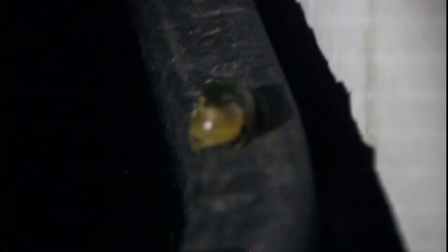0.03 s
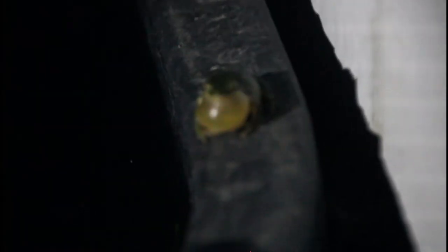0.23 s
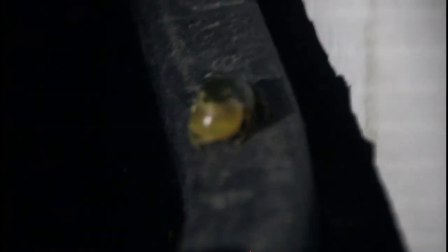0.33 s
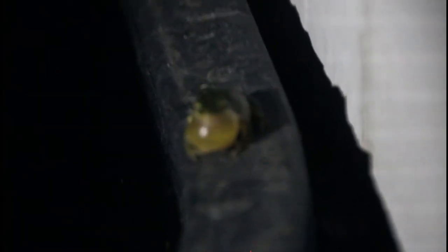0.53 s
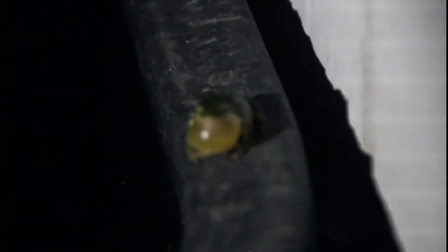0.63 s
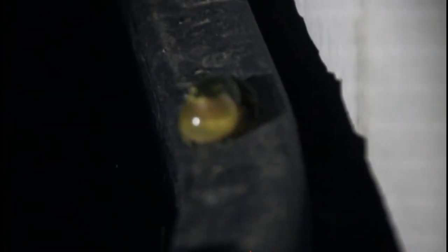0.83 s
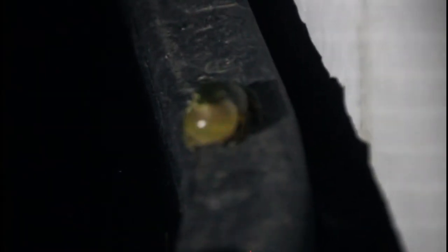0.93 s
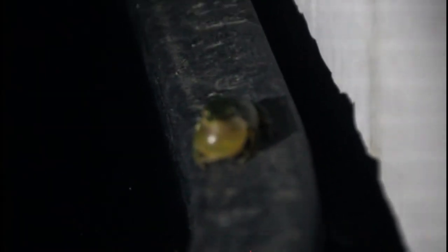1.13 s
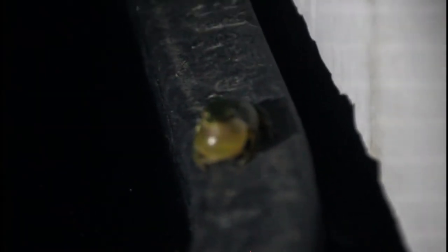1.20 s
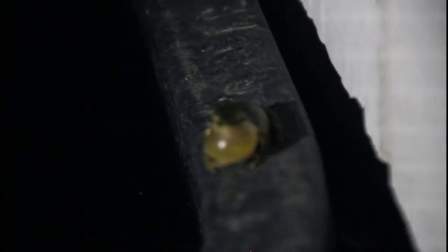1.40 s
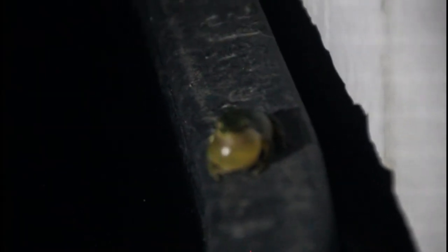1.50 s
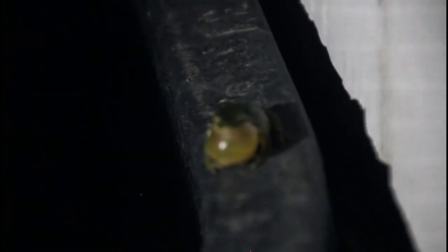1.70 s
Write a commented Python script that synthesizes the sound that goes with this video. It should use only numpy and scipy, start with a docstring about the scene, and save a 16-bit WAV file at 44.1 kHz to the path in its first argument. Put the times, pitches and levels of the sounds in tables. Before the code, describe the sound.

A small tree frog gives one harsh two-note croak over a low outdoor rumble.

```python
"""Outdoors at night, over a low rumble: a small tree frog close to the microphone gives one harsh,
two-note croak. Each note is a run of short pulses: a snap of the larynx rings the throat, then come
a few cycles of raspy tone whose octave the vocal sac favours. Near surfaces throw the call back.
The croak drives the recorder's limiter, so the background ducks and swells back."""
import sys
import numpy as np
from scipy import signal
from scipy.fft import rfft, irfft
from scipy.io import wavfile
from scipy.ndimage import uniform_filter1d, minimum_filter1d

SR = 44100
rng = np.random.default_rng(int(sys.argv[2]) if len(sys.argv) > 2 else 0)


def transcribe(u):
    """Save the signal u as a 16-bit wav file named by the first command-line argument.

    u: samples, shape (n,) or (channels, n), limited to [-1, 1]; the rate is SR.
    q: integer samples, one column per channel.
    """
    v = np.clip(np.atleast_2d(u).T, -1, 1)
    q = np.round(v * 32767).astype(np.int16)
    wavfile.write(sys.argv[1], SR, q)


N = 77175
TIME = np.arange(N) / SR

# Spectrum of the night air. Each row: frequency in Hz, relative density in dB.
AIR_SPECTRUM = [(12, -43), (20, -38), (58, -3), (127, -1), (177, -7.5), (204, -14.5), (241, -12),
                (347, -22), (459, -21.5), (698, -33), (923, -28), (1090, -34.5), (1330, -32.5), (1570, -39),
                (1810, -36), (2200, -44.5), (3530, -50), (4060, -50.5), (8650, -57.5), (14700, -58),
                (16000, -53.5)]
# Slow rise and fall of the bass. Each row: time in seconds, gain in dB.
BASS_LEVEL = [(0, -4), (.18, 0), (.36, 1), (.55, 1), (.73, 2.5), (.92, 0), (1.14, -0.5), (1.3, 1),
              (1.5, -1), (1.75, -2.5)]
# The same for the hiss above the bass. Each row: time in seconds, gain in dB.
HISS_LEVEL = [(0, 1), (.7, 0.5), (1.1, -0.5), (1.5, 0.5), (1.75, 1)]
# Overall level, which dips briefly at the start. Each row: time in seconds, gain in dB.
OVERALL_LEVEL = [(.03, 1), (.044, -12), (.05, -27), (.064, -35), (.075, -15), (.093, 1)]
# Reflections off surfaces near the frog. Each row: delay in seconds, gain in dB.
ECHOES = [(.0034, -19), (.0088, -31)]
# Colour of the diffuse tail. Each row: frequency in Hz, relative density in dB.
TAIL_SPECTRUM = [(500, 2.5), (1650, -1), (2500, -2), (3380, -4), (4000, 2.5), (4800, -2), (5150, 12),
                 (5600, 6.5), (6800, -3), (9400, -4), (10150, 9), (11000, -7.5), (16000, -5.5)]
# Soft whines between the notes. Each row: start and length in seconds, first and last pitch in Hz,
# level in dB.
WHINES = [(.785, .085, 839, 760, -28), (.812, 0.053, 1220, 1320, -26.5), (.815, 0.083, 1650, 1590, -30.5)]
# Pulses of the croak. Each row: start in seconds, level in dB, pitch in Hz, swell in seconds,
# snap in dB relative to the pulse, top of the treble in Hz.
PULSES = [(0.7111, -28, 1610, 0.0003, 2, 4000), (0.7264, -8, 1550, 0.00096, 6, 6200),
          (0.7374, -3, 1503, .0010, 6, 6500), (0.7477, 3.5, 1582, 0.000506, 6.5, 8200),
          (0.7581, 1, 1590, .0006, 6, 9500), (0.7687, 6, 1593, 0.002, -7, 11000),
          (.7799, 10.5, 1632, .0016, -4, 12500), (0.7903, 10, 1646, 0.0023, -12.5, 12500),
          (0.8013, 6.5, 1629, .0020, -9.5, 12500), (0.8679, 12.5, 1679, .0022, -11.5, 13000),
          (0.8776, 9, 1687, 0.0023, -24.5, 12500), (0.888, 5, 1691, 0.0036, -26, 12000),
          (0.9026, 1, 1702, 0.0019, -25, 11000)]
# Nearly harmonic partials of the tone. Each row: multiple of the pitch, relative level in dB.
PARTIALS = [(.98, -10.5), (2, -4.5), (3.06, -40), (4, -38), (5, -44.5), (6.15, -47.5), (7.7, -55.5)]
# Throat and sac resonances. Each row: frequency in Hz, relative level in dB, seconds to fall 60 dB.
THROAT_MODES = [(1590, -17, 0.013), (2280, -13, 0.005), (2900, -3, 0.0093), (3239, -9, 0.018),
                (4400, -33, 0.0097), (5976, -29, .008), (7760, -30, 0.0056), (12700, -29, .016)]
# Rasp riding on the pulses. Each row: frequency in Hz, relative density in dB.
RASP_SPECTRUM = [(600, -34), (1500, -8.5), (2600, 11.5), (3800, 2), (4400, -3), (5500, -17.5), (6700, -8),
                 (9400, -25.5), (10600, -18), (13000, -28), (16000, -27.5)]

AIR_DB, SWAY_DB, SWAY_HZ, BASS_TOP_HZ = -29, 1.0, 4.5, 270
HUM_HZ, HUM_DB, HUM_WAVER_SHARE, HUM_SWAY_DB = 121, -39, 0.0535, 5
TAIL_DB, TAIL_DELAY_S = -18, .009
TAIL_LOW_T60_S, TAIL_TREBLE_T60_S, TAIL_SPLIT_HZ = 0.3, 0.25, 3200
JITTER_SHARE, JITTER_HZ, WHINE_WAVER_SHARE = .006, 500, 0.077
ONSET_S, START_SHARE, HOLD_PER_SWELL, FADE_S, FADE_PER_SWELL = .0003, .38, .5, .0011, .22
SAC_LOW_HZ, SNAP_SOFT_HZ = 1242, 8000
RASP_DB, RASP_DB_PER_DB, RASP_PULSING_DEPTH = -24, 0.068, 0.45
LIMIT_DB, LIMIT_ATTACK_S, LIMIT_HOLD_S, RELEASE_DB_PER_S = -0.2, 0.00019, 0.091, 36
STOPBAND_HZ = 16600


def from_db(db):
    """Decibels to gain."""
    return 10 ** (np.asarray(db) / 20)


def unit_rms(x):
    """Scale to unit rms."""
    return x / np.sqrt(np.mean(x ** 2) + 1e-20)


def curve(rows):
    """Join (seconds, value) rows by straight lines."""
    return np.interp(TIME, *np.transpose(rows))


def butter(order, hz, kind="low"):
    """Sections of a low-pass or high-pass filter."""
    return signal.butter(order, hz, kind, fs=SR, output="sos")


def noise(spectrum):
    """Unit noise with a given (Hz, dB) colour."""
    hz, db = np.transpose(spectrum)
    bins = np.maximum(np.fft.rfftfreq(N, 1 / SR), 1)
    gain = from_db(np.interp(np.log(bins), np.log(hz), db)) * np.minimum(bins / hz[0], 1)
    return unit_rms(irfft(rfft(rng.standard_normal(N)) * gain, N))


def drift(hz):
    """Smooth random wander of unit rms, mostly slower than hz."""
    bins = np.fft.rfftfreq(N, 1 / SR)
    return unit_rms(irfft(rfft(rng.standard_normal(N)) / (1 + (bins / hz) ** 2), N))


def ring(clicks, hz, t60):
    """A unit click sets a decaying sine of height 1 ringing."""
    radius, angle = from_db(-60 / (t60 * SR)), 2 * np.pi * hz / SR
    return signal.lfilter([0, np.sin(angle)], [1, -2 * radius * np.cos(angle), radius ** 2],
                          clicks + 1e-18)


def night_air():
    """All around the microphone, a low rumble and a wavering hum sway gently under a smooth hiss."""
    air = from_db(AIR_DB) * noise(AIR_SPECTRUM)
    bass = signal.sosfiltfilt(butter(2, BASS_TOP_HZ), air)
    hiss = (air - bass) * from_db(curve(HISS_LEVEL))
    phase = 2 * np.pi * np.cumsum(HUM_HZ * (1 + HUM_WAVER_SHARE * drift(hz=7.1))) / SR
    hum = from_db(HUM_DB + HUM_SWAY_DB * drift(SWAY_HZ)) * np.sin(phase)
    sway = from_db(curve(BASS_LEVEL) + SWAY_DB * drift(SWAY_HZ))
    return hiss + (bass + hum) * sway


def surroundings(call):
    """The call arrives direct, then off two near surfaces, then as a thin tail, treble dying first."""
    wash = noise(TAIL_SPECTRUM) * (TIME > TAIL_DELAY_S)
    low = signal.sosfiltfilt(butter(6, TAIL_SPLIT_HZ), wash)
    tail = low * from_db(-60 * TIME / TAIL_LOW_T60_S)
    tail += (wash - low) * from_db(-60 * TIME / TAIL_TREBLE_T60_S)
    tail *= from_db(TAIL_DB) / np.sqrt(np.sum(tail ** 2))
    near = sum(from_db(db) * np.interp(TIME - delay, TIME, call) for delay, db in ECHOES)
    return call + near + signal.fftconvolve(call, tail)[:N]


def whines():
    """Faint wavering glides fill the pause between the notes."""
    out = np.zeros(N)
    for start, length, first_hz, last_hz, db in WHINES:
        along = np.clip((TIME - start) / length, 0, 1)
        hz = (first_hz + (last_hz - first_hz) * along) * (1 + WHINE_WAVER_SHARE * drift(hz=125))
        out += from_db(db) * np.sin(np.pi * along) * np.sin(2 * np.pi * np.cumsum(hz) / SR)
    return out


def larynx_snap(age):
    """A softened click of the larynx rings the throat and sac, in modes of alternating sign."""
    click = signal.sosfilt(butter(2, SNAP_SOFT_HZ), 1. * (age == 0))
    return sum((-1) ** k * from_db(db) * ring(click, hz, t60)
               for k, (hz, db, t60) in enumerate(THROAT_MODES))


def pulse_envelope(age, swell):
    """A pulse swells, holds and fades; a slow swell holds longer and fades more slowly."""
    onset = 1 - np.exp(-(age / ONSET_S) ** 2)
    rise = np.interp(age, [0, swell], [START_SHARE, 1])
    fading_for = np.maximum(age - swell - HOLD_PER_SWELL * swell, 0)
    return onset * rise * np.exp(-fading_for / (FADE_S + FADE_PER_SWELL * swell))


def frog():
    """Close to the microphone, each pulse is a snap and a raspy tone; the first note opens dull and brightens
    as it goes."""
    out = np.zeros(N)
    jitter = 1 + JITTER_SHARE * drift(JITTER_HZ)
    hiss = from_db(RASP_DB) * noise(RASP_SPECTRUM)
    age = TIME[:SR // 40]  # 25 ms for each pulse
    snap = larynx_snap(age)
    for start, db, hz, swell, snap_db, top_hz in PULSES:
        span = slice(int(start * SR), int(start * SR) + len(age))
        phase = 2 * np.pi * hz * np.cumsum(jitter[span]) / SR
        tone = sum(from_db(level) * np.sin(multiple * phase) for multiple, level in PARTIALS)
        # Louder pulses are raspier, and each cycle of the tone gates the rasp.
        rasp = from_db(RASP_DB_PER_DB * db) * hiss[span] * (1 + RASP_PULSING_DEPTH * np.cos(phase))
        pulse = pulse_envelope(age, swell) * (tone + rasp) + from_db(snap_db) * snap
        out[span] += from_db(db) * signal.sosfilt(butter(4, top_hz), pulse)
    return signal.sosfilt(butter(4, SAC_LOW_HZ, "high"), out)  # the small sac radiates little bass


def scene():
    """One microphone hears the close frog over the night air; the level dips briefly at the start."""
    call = surroundings(frog() + whines())
    return ((call + night_air()) * from_db(curve(OVERALL_LEVEL)))[None]


def record(dry):
    """The recorder's fast limiter holds its cut briefly and lets go slowly; the top is filtered off."""
    over_db = np.maximum(20 * np.log10(np.abs(dry[0]) + 1e-9) - LIMIT_DB, 0)
    hold = 2 * int(LIMIT_HOLD_S * SR / 2) + 1
    held_db = -minimum_filter1d(-over_db, hold, origin=hold // 2)
    release_db = RELEASE_DB_PER_S * TIME
    cut_db = np.maximum.accumulate(held_db + release_db) - release_db
    # The cut eases in just ahead of each peak.
    window = 2 * int(LIMIT_ATTACK_S * SR) + 1
    cut_db = uniform_filter1d(-minimum_filter1d(-cut_db, window), window)
    top_filter = signal.cheby2(16, 70, STOPBAND_HZ, fs=SR, output="sos")
    return signal.sosfilt(top_filter, dry * from_db(-cut_db))


dry = scene()
out = record(dry)
transcribe(out)
```